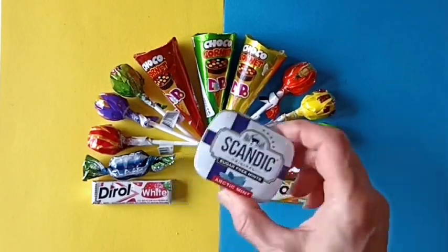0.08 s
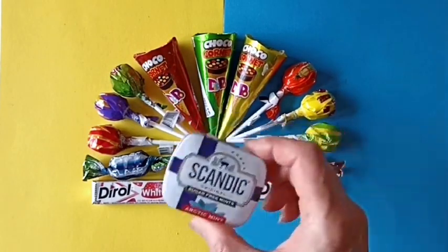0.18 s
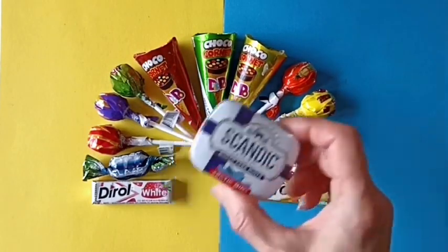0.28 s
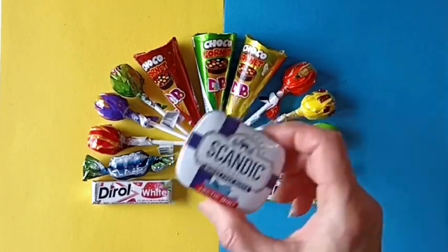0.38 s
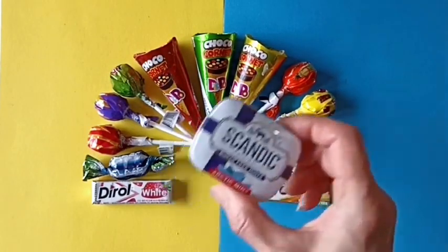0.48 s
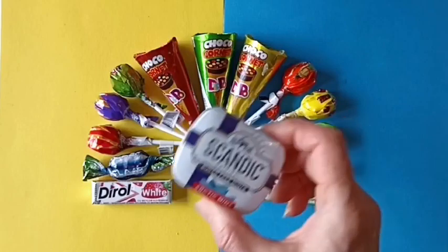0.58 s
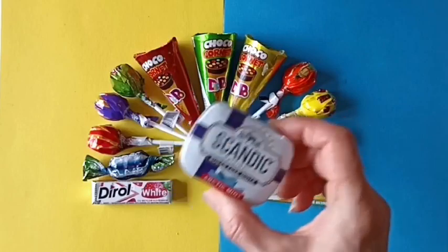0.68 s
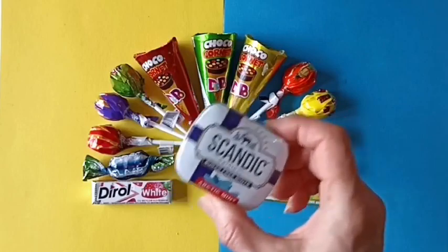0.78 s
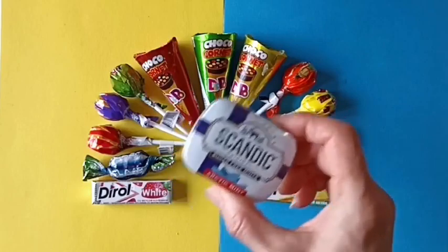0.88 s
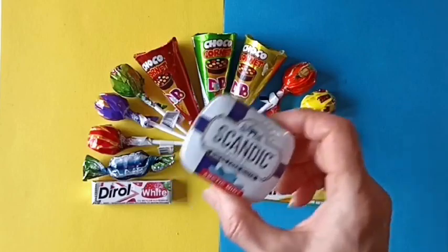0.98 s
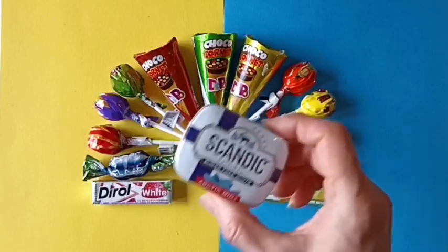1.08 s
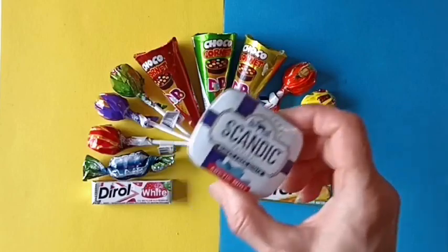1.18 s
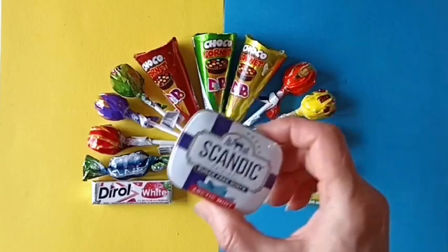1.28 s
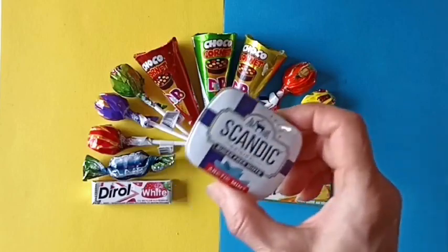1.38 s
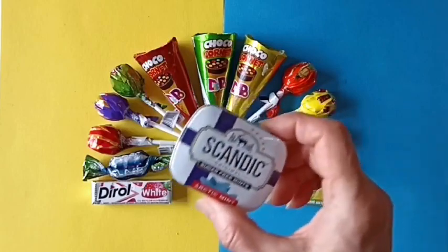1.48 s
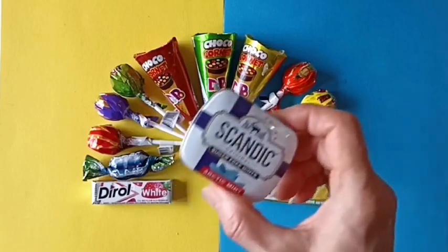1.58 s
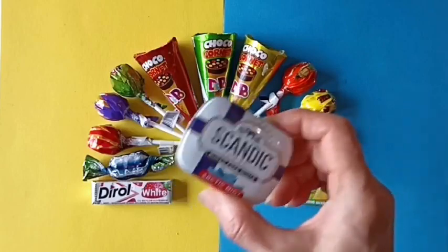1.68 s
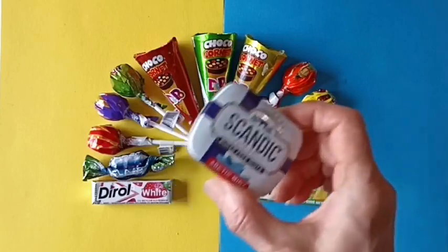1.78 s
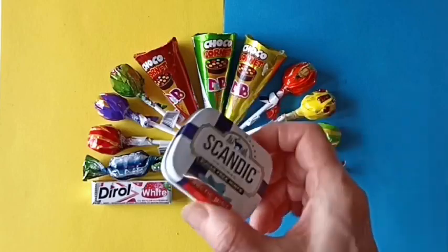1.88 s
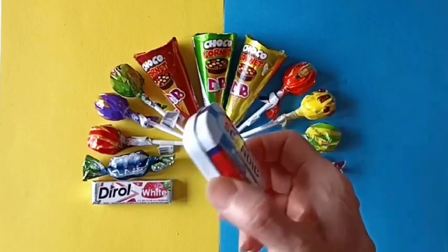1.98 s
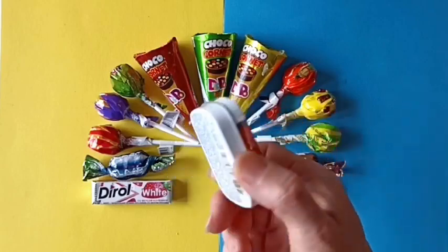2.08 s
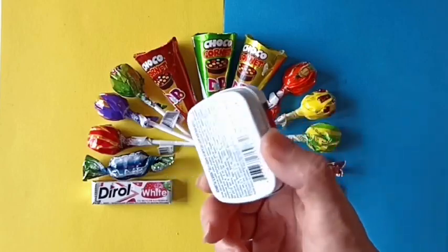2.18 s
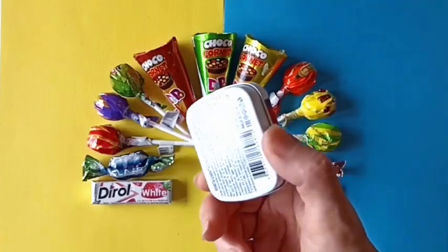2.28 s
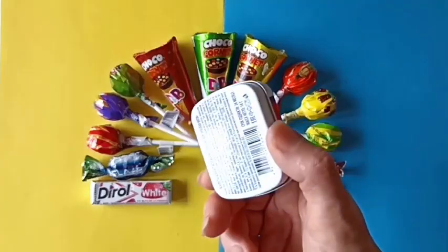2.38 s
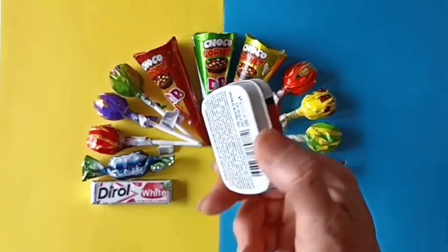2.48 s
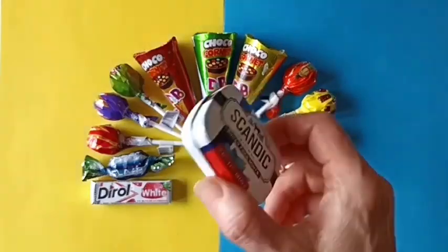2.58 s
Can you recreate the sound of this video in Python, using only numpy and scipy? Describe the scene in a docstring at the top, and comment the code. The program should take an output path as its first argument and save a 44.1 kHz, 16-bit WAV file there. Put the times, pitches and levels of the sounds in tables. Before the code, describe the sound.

Hard mints rattle sharply in a small metal tin shaken fast, then tumble as it turns over

```python
"""A small tin of hard mints is shaken by hand close to the microphones, nearly ten strokes a second.
At each stroke mints graze and click on the wall and the pile lands: runs of cracks and short metal modes.
Then the tin is turned over and they drop on its free, ringing face, built from longer decaying modes.
A soft rub of the fingers is filtered noise. A small room answers, over quiet air and a faint hum of sines."""
import sys
import numpy as np
from scipy import signal
from scipy.fft import rfft, irfft
from scipy.io import wavfile

SR = 44100
rng = np.random.default_rng(int(sys.argv[2]) if len(sys.argv) > 2 else 0)


def put_to_file(sound):
    """Save the sound as 16-bit audio at rate SR, in the file named by the first command-line argument."""
    columns = np.atleast_2d(sound).T  # one column per channel
    safe = np.clip(columns, -1, 1)
    whole_steps = np.round(safe * 32767)
    wavfile.write(sys.argv[1], SR, whole_steps.astype(np.int16))


N = 114660  # length in samples, 2.6 s

# All levels of the mints are relative: HIT_DB, the mix and the colour still act on them.
# The pile lands. Each row: start in seconds, level in dB, time to settle in seconds,
# boom of the tin in dB, brightness in dB.
PILE_LANDINGS = [(.246, -3.5, 0.013, -3, 2), (.344, -5.5, 0.011, -2, -10), (0.45, -2, 0.017, -2, -2.5),
                 (.571, -3.5, 0.023, -3, 0.5), (.662, -5.5, 0.013, 4.5, -4), (.771, -5.5, 0.017, 1, 2),
                 (.876, -4.5, 0.0081, 2, 2.5), (.986, -6.5, 0.015, 5.5, 0.5), (1.080, -3, 0.015, -1.5, 1),
                 (1.201, -4, 0.012, 2, 2), (1.301, -4, 0.0037, 0.5, -5), (1.416, -4, 0.0062, 2.5, -1),
                 (1.516, -6, 0.0085, 5.5, 7.5), (1.624, -6, 0.013, -1, 3), (1.711, -6.5, 0.012, 0.5, 6),
                 (1.819, -5, 0.0081, 2, 2.5), (1.900, -4, 0.013, 4, 4.5), (2.043, -13.5, 0.033, 4.5, 0.5)]
# Single mints hit the wall. Each row: start in seconds, level in dB, brightness in dB.
WALL_CLICKS = [(0.051, -28.5, -13), (0.059, -27, 5), (.105, -21, 5), (0.143, -24, -7.5), (.169, -31, -36),
               (.2455, -12.5, -5), (.340, -11, 6), (.345, -3.5, 10.5), (.430, -11, 1), (0.441, -13, -2),
               (0.442, -11, 4), (.4535, -8.5, 8), (.561, -9.5, 7.5), (0.655, -8.5, 0.5), (0.664, -7, 9),
               (.673, -16, 6), (.762, -11, 9), (.772, -9.5, 12), (.832, -21, -3), (0.845, -16, 1),
               (.860, -18.5, 4), (.872, -5.5, 5), (.983, -7, 6), (1.025, -21, -9), (1.069, -14, 3),
               (1.074, -17, 7), (1.078, -4, -10), (1.190, -14.5, 0), (1.198, -5.5, 4), (1.271, -13.5, -3),
               (1.281, -15, 2), (1.297, -5.5, -2.5), (1.305, -4.5, 4.5), (1.405, -20, 7), (1.413, -5, 4.5),
               (1.434, -20, 13.5), (1.502, -17.5, 10.5), (1.513, -1.5, -0.5), (1.617, -6, 1.5),
               (1.682, -14, 0.5), (1.704, -2.5, -4.5), (1.808, -8, 2.5), (1.874, -14.5, 4),
               (1.893, -5, 3.5), (1.901, -5.5, 5.5), (2.020, -22, -18), (2.029, -19.5, -4.5),
               (2.059, -19, -3), (2.084, -21.5, 4), (2.099, -23, 6)]
# Mints drop on the free face of the turned tin. Each row: start in seconds, level in dB,
# ring of the face in dB beside the knock, boom of the tin in dB.
FACE_DROPS = [(2.2115, -13.5, 1.5, 5), (2.228, -9, -8, 7.5), (2.253, -17, 2, 5), (2.277, -9.5, 0, -9),
              (2.2815, -8, -4.5, 1.5), (2.294, -10, 0.5, -3), (2.329, -13.5, -4, -16)]
# Mints slide and jostle between landings. Each row: time in seconds, level in dB.
SLIDING_LEVEL = [(0, -53.5), (.15, -51), (.19, -60), (0.236, -37.5), (.3, -40), (.9, -43), (1.15, -45),
                 (1.299, -42.5), (1.88, -41), (2.0, -53.5), (2.1, -52.5), (2.13, -68), (2.6, -84.5)]
# Modes of the tin and the mints. Each row: frequency in Hz, level in dB, 60 dB decay time in seconds.
TIN_MODES = [(1012.6, -11.5, 0.044), (1246.5, -9.5, 0.029), (1524, -19.5, 0.051), (1934, -5, 0.023),
             (2102, -8.5, 0.065), (2487, -9.5, 0.027), (2772, -9, 0.023), (3303, -11, 0.05),
             (3977, -14, 0.025), (6600, -9, 0.03), (8660, -15, .025), (11400, -9, 0.045),
             (12250, -4, 0.024), (13170, -5, 0.023)]
# Modes of the undamped face. Each row: frequency in Hz, level in dB, 60 dB decay time in seconds.
FACE_MODES = [(1178, -18, 0.023), (2087, 1.5, .14), (2110, -3.5, 0.095), (4260, -12, 0.046),
              (4510, -9, 0.036), (5750, -5.5, .14), (6350, -12.5, 0.046), (7650, -11, 0.07),
              (12300, -5, 0.025), (13700, -9, 0.032)]
# Colour of all the mints' sounds. Each row: frequency in Hz, gain in dB.
HIT_COLOUR = [(40, -25), (150, -26.5), (350, -18), (600, -8), (780, -9), (1050, -0.5), (1700, 1.5),
              (2050, 1), (2320, -0.5), (2650, 5), (3500, 0), (3950, 5.5), (5300, -1), (8000, -1.5),
              (10500, -1), (11400, -4), (12200, 0.5), (15000, -2), (16200, -17)]
# Stereo balance of the mints. Each row: frequency in Hz, left minus right in dB.
STEREO_BALANCE = [(100, -3.5), (1200, 2), (2800, -2.5), (4000, -3), (5200, -1.5), (6500, -7), (8000, -7.5),
                  (9800, 2), (12000, 13.5), (13300, 11.5), (15000, 6)]
# Likeness of the two channels. Each row: frequency in Hz, likeness from 0 (unrelated) to 1 (same).
STEREO_LIKENESS = [(50, 0.38), (1200, 0.99), (2800, 0.84), (5000, 0.051), (16000, 0.22)]
# Decay of the room. Each row: frequency in Hz, 60 dB decay time in seconds.
ROOM_DECAY = [(200, 1), (800, 0.36), (2100, 0.22), (5500, 0.21), (15000, 0.16)]
# Spectrum of the quiet air. Each row: frequency in Hz, relative level in dB.
AIR_SPECTRUM = [(20, -17.5), (50, -14), (100, 2.5), (200, -5), (400, -5), (800, -14), (1300, -21.5),
                (2000, -18.5), (5000, -25), (15000, -32.5)]
# Partials of the hum. Each row: frequency in Hz, RMS level in dB.
HUM_PARTIALS = [(98.5, -76), (147.5, -67.5), (196, -77.5), (344.5, -74), (393, -73)]
# Fingers shift on the tin, a soft hollow rub. Each row: time in seconds, RMS level in dB.
RUB_LEVEL = [(0, -60), (.07, -61), (.12, -66), (.2, -91.5)]

# One knock: decay constants of crack and shell, time for the contact to build, gains of the parts
CRACK_S, SHELL_S, CONTACT_S = 0.00081, 0.0081, 0.00036
CRACK_DB, SHELL_DB, MODES_DB, HIT_DB = 3.5, 6, -1, 9.5
GRIP_BEND = 0.031  # share by which the lowest mode wanders from knock to knock
BOOM_HZ, BRIGHT_HZ = 1600, 8000  # boom acts below the first, brightness above the second
LOAD_RIPPLE_DB, LOAD_RIPPLE_HZ = 3, 259.6  # depth and starting spacing of the load's ripple
FACE_SCATTER_DB = 3

# Runs of knocks; the pile rate also paces the grazing
PILE_HITS_PER_S, SLIDE_HITS_PER_S, SCATTER_DB = 700, 600, 5.5
PILE_RISE_S = 0.00093
APPROACH_S, APPROACH_DB = 0.011, -10.5  # mints graze the tin more and more just before the pile lands
SOFT_THIN_SHARE = 0.32  # the softer a single knock, the less of the tin's boom it raises (dB per dB)
SLIDE_BOOM_DB = -1
TUMBLE_AT_S, TUMBLE_SETTLE_S = 2.289, 0.027
TUMBLE_DB, TUMBLE_RING_DB = -7, -3.5  # the ring is relative to the tumble

RUB_HZ, RUB_WIDTH_HZ = 870, 230
ROOM_DB, ROOM_ONSET_S, ROOM_DULL_DB = -7.5, 0.0036, -4.5
AIR_DB = -63.5  # RMS level
RIGHT_LAG_S = 0.00007  # lag of the part that both channels share
EDGE_HZ = 15650  # top of the recorder's band


def amp(db):
    """Decibels to gain."""
    return 10 ** (np.asarray(db) / 20)


def unit(x):
    """Scales to a mean energy of one per channel."""
    return x / np.sqrt(np.mean(np.sum(x ** 2, -1)) + 1e-20)


def read(points, hz):
    """Reads a table on a log-frequency axis."""
    f, value = np.transpose(points)
    return np.interp(np.log(hz + 1), np.log(f + 1), value)


def level_over_time(points):
    """Turns rows of seconds and dB into a gain for every sample."""
    return amp(np.interp(np.arange(N) / SR, *np.transpose(points)))


def add(mix, s, sound):
    """Mixes a stereo sound in at time s."""
    part = mix[:, max(round(s * SR), 0):][:, :sound.shape[1]]
    part += sound[:, :part.shape[1]]


def colour(x, gain_db):
    """Causal minimum-phase filter from a function that gives dB for each frequency."""
    size = 2048
    log_gain = np.log(amp(gain_db(abs(np.fft.fftfreq(size, 1 / SR)))))
    taps = np.fft.ifft(np.exp(np.conj(signal.hilbert(log_gain)))).real
    return signal.fftconvolve(x, np.atleast_2d(taps)[:, :size // 2], axes=1)[:, :x.shape[1]]


def voiced(x, boom_db, bright_db):
    """Low boom and brightness, as set by where and how hard the wall is hit."""
    def gain_db(hz):
        boom = boom_db / (1 + (hz / BOOM_HZ) ** 4)
        bright = bright_db * (1 - 1 / (1 + (hz / BRIGHT_HZ) ** 4))
        return boom + bright
    return colour(x, gain_db)


def pair(z, hz):
    """Makes two unrelated spectra as alike as the two microphones hear them."""
    same = np.clip(read(STEREO_LIKENESS, hz), -1, 1)
    shared = same * z[0] * np.exp(-2j * np.pi * hz * RIGHT_LAG_S)
    own = np.sqrt(1 - same ** 2) * z[1]
    return np.array([z[0], shared + own])


def noise(size):
    """White stereo noise with the likeness of the microphone pair."""
    spectra = rfft(rng.standard_normal((2, size)))
    return irfft(pair(spectra, np.fft.rfftfreq(size, 1 / SR)), size)


def background():
    """Quiet room air as shaped noise, and the faint hum of an appliance as steady sines."""
    t = np.arange(N) / SR
    air = irfft(rfft(noise(N)) * amp(read(AIR_SPECTRUM, np.fft.rfftfreq(N, 1 / SR))), N)
    hum = sum(amp(db) * np.sqrt(2) * np.sin(2 * np.pi * (hz * t + rng.random()))
              for hz, db in HUM_PARTIALS)
    return amp(AIR_DB) * np.sqrt(N) * unit(air) + hum


def room(x):
    """A short diffuse tail whose treble dies first."""
    size = SR // 2
    hz, t, z = signal.stft(noise(size), SR, nperseg=256)
    fade = amp(-60 * t / read(ROOM_DECAY, hz)[:, None])
    tail = signal.istft(z * fade, SR, nperseg=256)[1][:, :size]
    onset = 1 - np.exp(-(np.arange(size) / SR / ROOM_ONSET_S) ** 2)
    tail = voiced(unit(tail * onset), 0, ROOM_DULL_DB)
    return amp(ROOM_DB) * signal.fftconvolve(x, tail, axes=1)[:, :N]


def rub():
    """Skin friction, a noise heard as a soft hollow band around 870 Hz."""
    x = colour(noise(N), lambda hz: -20 * np.log10(1 + ((hz - RUB_HZ) / RUB_WIDTH_HZ) ** 2))
    return np.sqrt(N) * unit(x) * level_over_time(RUB_LEVEL)


def strikes(count=32, size=4096):
    """One mint on each of many spots: a crack, a blur of dense modes and main modes bent by grip and load."""
    t, (hz, db, t60) = np.arange(size) / SR, np.transpose(TIN_MODES)
    fades = unit(amp(-60 * t / t60[:, None])) * amp(db)[:, None]
    spots = []
    for _ in range(count):
        # higher modes bend by a smaller share
        bent_hz = hz * (1 + GRIP_BEND * rng.standard_normal(len(hz)) / np.sqrt(hz / hz[0]))
        rings = fades * np.exp(2j * np.pi * bent_hz[:, None] * t)
        random_weights = rng.standard_normal((2, len(hz))) + 1j * rng.standard_normal((2, len(hz)))
        modes = (pair(random_weights, hz) @ rings).real
        crack = unit(noise(size) * np.exp(-t / CRACK_S))
        shell = unit(noise(size) * np.exp(-t / SHELL_S))
        spots.append(unit(amp(CRACK_DB) * crack + amp(SHELL_DB) * shell + amp(MODES_DB) * modes))
    return np.array(spots) * (1 - np.exp(-t / CONTACT_S))


def loaded(x, count=48):
    """The mints lie differently at every blow and shift the tin's broad resonances."""
    ripple = LOAD_RIPPLE_DB * rng.standard_normal(count).clip(-1.5, 1.5)
    knots_hz = LOAD_RIPPLE_HZ * np.arange(count) * (1 + np.arange(count) / count / 2)
    return unit(colour(x, lambda hz: np.interp(hz, knots_hz, ripple)))


def sliding(spots):
    """Many tiny knocks as the mints move over the floor of the tin and each other."""
    sizes = amp(SCATTER_DB * rng.standard_normal(N).clip(-2, 2))
    knocks = sizes * (rng.random(N) < SLIDE_HITS_PER_S / SR)
    knocks = unit(knocks) * np.sqrt(N) * level_over_time(SLIDING_LEVEL)
    out, spot = np.zeros((2, N)), rng.integers(0, len(spots), N)
    for i in np.flatnonzero(knocks):
        add(out, i / SR, knocks[i] * spots[spot[i]])
    return out


def approach(spots, count=22):
    """A swelling run of grazing knocks; returns its length in seconds and its sound."""
    out = np.zeros((2, SR // 5))
    ahead = (np.arange(count) + rng.random(count)) / PILE_HITS_PER_S  # seconds before the landing
    length = count / PILE_HITS_PER_S
    for s, spot in zip(ahead, rng.integers(0, len(spots), count)):
        add(out, length - s, np.exp(-s / APPROACH_S) * spots[spot])
    return length, unit(out)


def landing(spots, settle_s, count=65):
    """The pile hits: a quick run of strikes that swell at once and die away."""
    out = np.zeros((2, SR // 3))
    times = (np.arange(count) + rng.random(count)) / PILE_HITS_PER_S
    scatter = amp(SCATTER_DB * rng.standard_normal(count).clip(-2, 1))
    sizes = scatter / (1 + (times / settle_s) ** 3) * (1 - np.exp(-times / PILE_RISE_S))
    for s, size, spot in zip(times, sizes, rng.integers(0, len(spots), count)):
        add(out, s, size * spots[spot])
    return unit(out)


def face():
    """The broad face of the tin rings when no finger damps it, a little differently at each spot."""
    t, (hz, db, t60) = np.arange(SR // 4) / SR, np.transpose(FACE_MODES)
    phases = pair(np.exp(2j * np.pi * rng.random((2, len(hz)))), hz)
    weights = phases * amp(db + FACE_SCATTER_DB * rng.standard_normal(len(hz)))
    rings = amp(-60 * t / t60[:, None]) * np.exp(2j * np.pi * hz[:, None] * t)
    return unit((weights @ rings).real)


def turning(spots):
    """A few mints drop on the free face and the pile tumbles among them, each with knock and ring."""
    out = np.zeros((2, N))
    for (s, db, ring_db, boom_db), spot in zip(FACE_DROPS, strikes(count=len(FACE_DROPS))):
        add(out, s, amp(db) * voiced(loaded(spot), boom_db, 0))
        add(out, s, amp(db + ring_db) * face())
    add(out, TUMBLE_AT_S, amp(TUMBLE_DB) * loaded(landing(spots, TUMBLE_SETTLE_S)))
    tumble_ring = landing([face() for _ in range(10)], TUMBLE_SETTLE_S)
    add(out, TUMBLE_AT_S, amp(TUMBLE_DB + TUMBLE_RING_DB) * tumble_ring)
    return out


def shaking(spots):
    """Stroke by stroke the mints graze the tin, click on its wall and land in a pile."""
    out = np.zeros((2, N))
    for s, db, settle_s, boom_db, bright_db in PILE_LANDINGS:
        lead_s, graze = approach(spots)
        add(out, s - lead_s, amp(db + APPROACH_DB) * graze)
        few_spots = rng.choice(spots, size=12, replace=False)
        pile = loaded(landing(few_spots, settle_s))
        add(out, s, amp(db) * voiced(pile, boom_db, bright_db))
    for (s, db, bright_db), spot in zip(WALL_CLICKS, strikes(count=len(WALL_CLICKS))):
        add(out, s, amp(db) * voiced(loaded(spot), SOFT_THIN_SHARE * db, bright_db))
    return out


def mints():
    """Everything the mints do, coloured by the tin and its place before the microphones."""
    spots, sides = strikes(), np.array([[.5], [-.5]])  # half the balance to each side
    hits = amp(HIT_DB) * (shaking(spots) + turning(spots))
    knocks = hits + voiced(sliding(spots), SLIDE_BOOM_DB, 0)
    return colour(knocks, lambda hz: read(HIT_COLOUR, hz) + sides * read(STEREO_BALANCE, hz))


def scene():
    """The shaken tin and the rub of the fingers in their room."""
    tin = mints() + rub()
    return tin + room(tin) + background()


def record(dry):
    """The recorder's band limit, a steep low-pass."""
    low_pass = signal.firwin(255, EDGE_HZ, window=("kaiser", 8), fs=SR)
    return signal.oaconvolve(dry, low_pass[None], "same")


dry = scene()
out = record(dry)
put_to_file(out)
```